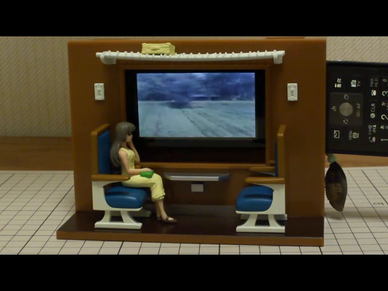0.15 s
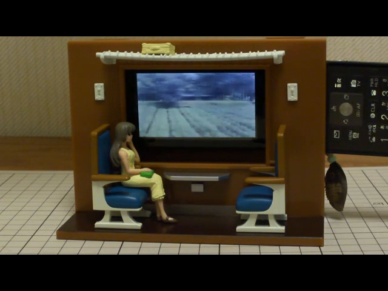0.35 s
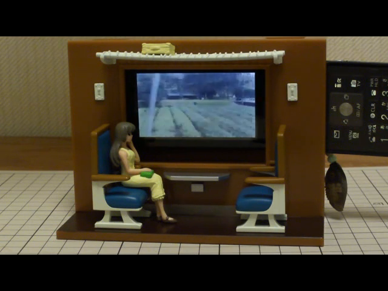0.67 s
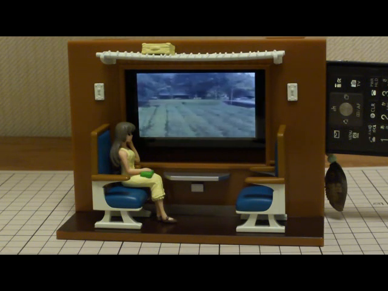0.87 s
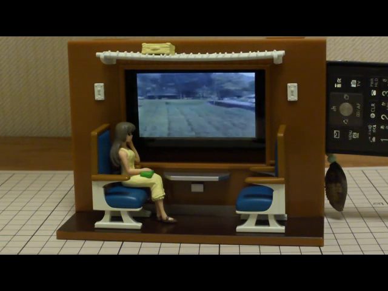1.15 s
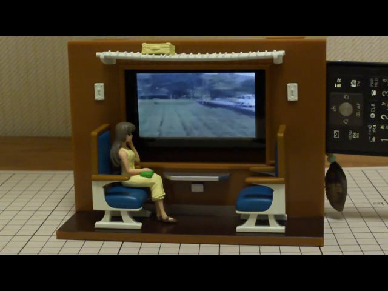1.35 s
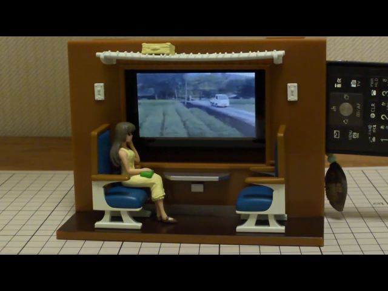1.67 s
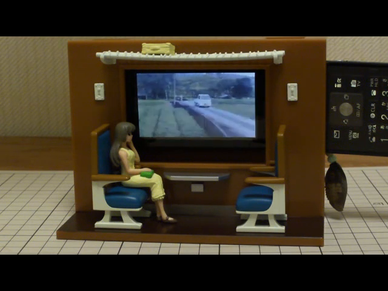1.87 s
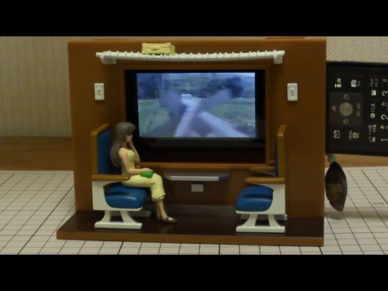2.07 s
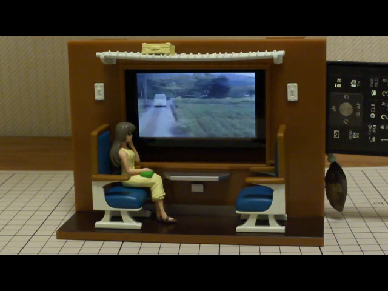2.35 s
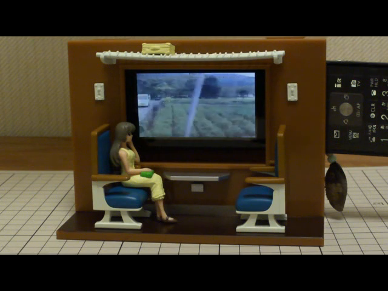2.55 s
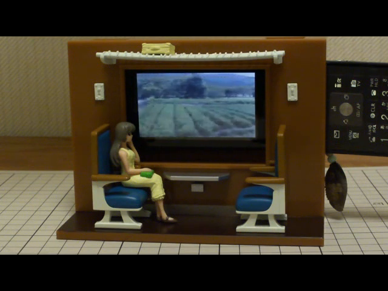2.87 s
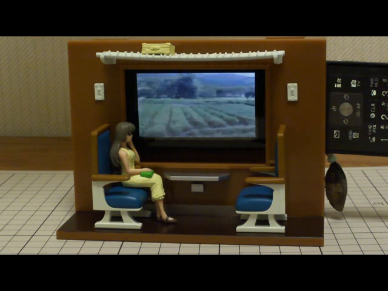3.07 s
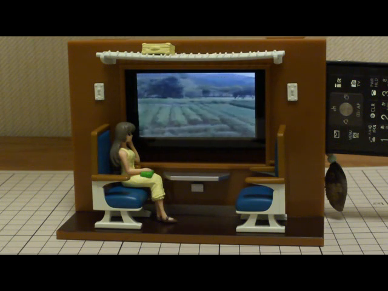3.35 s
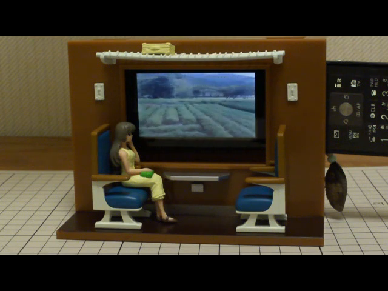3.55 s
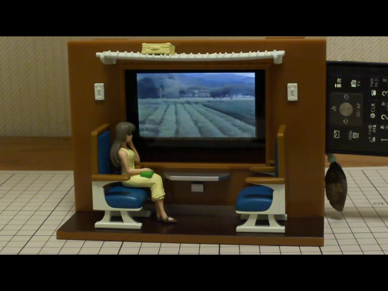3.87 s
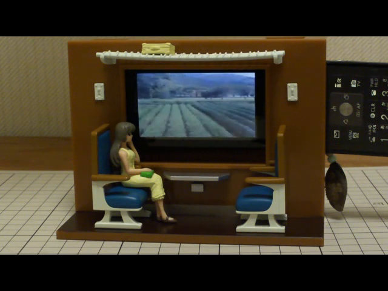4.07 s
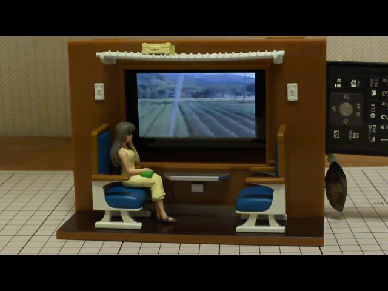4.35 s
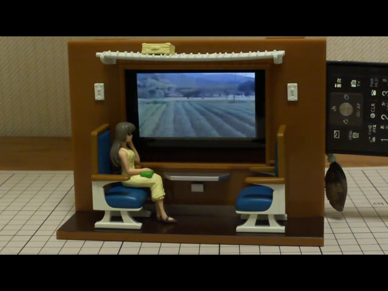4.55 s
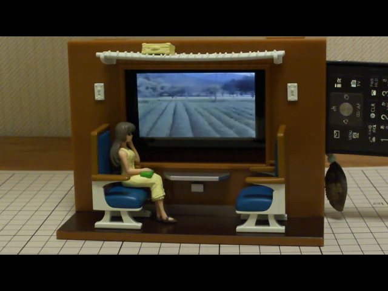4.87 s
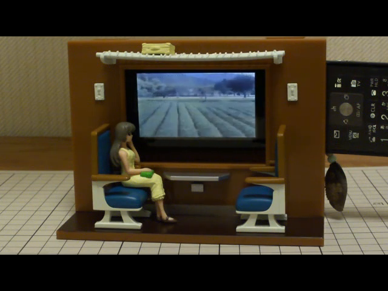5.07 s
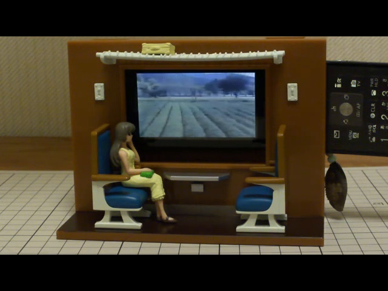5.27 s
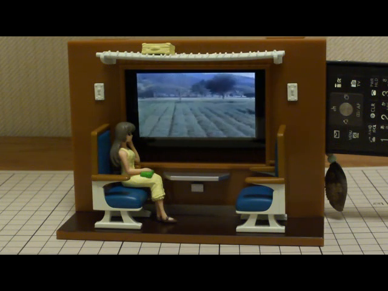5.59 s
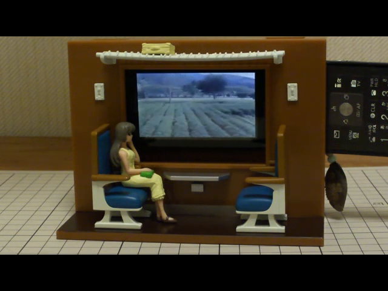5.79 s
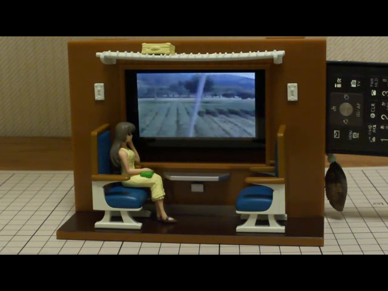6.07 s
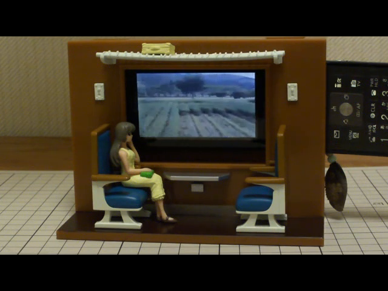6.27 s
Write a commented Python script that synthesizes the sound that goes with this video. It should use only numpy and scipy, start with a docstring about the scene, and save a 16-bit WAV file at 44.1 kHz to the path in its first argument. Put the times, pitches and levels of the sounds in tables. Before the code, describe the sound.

Tinny train wheels roll and clack over rail joints in three irregular bursts, with metallic rattles, a brief flange groan, soft hum and hiss.

```python
"""On a table, close to the microphone, a small loudspeaker in a model compartment plays a train carriage ride.
From the start wheels roll and knock, as filtered noise; fittings rattle, and a fan hums as wavering sines.
Rail joints clack in uneven clusters from 0.6, 2.6 and 4.6 s: noise bursts, ringing panels, clinks and tinkles.
Near 5.3 s a flange groans into the last cluster, as resonant noise; rolling and odd blows then carry on.
The loudspeaker gives no bass; soft room air, a gapped hiss and a thin electronic whine lie under it all."""
import sys
import numpy as np
from scipy import signal
from scipy.fft import rfft, irfft, next_fast_len
from scipy.io import wavfile
from scipy.ndimage import uniform_filter1d, map_coordinates

SR = 44100
rng = np.random.default_rng(int(sys.argv[2]) if len(sys.argv) > 2 else 0)


def output_pcm(signal):
    """Save a mono or channel-first signal as 16-bit PCM at the path in sys.argv[1].

    Samples are clipped to [-1, 1] before scaling.
    """
    pcm = np.clip(np.atleast_2d(signal).T, -1, 1) * 32767
    wavfile.write(sys.argv[1], SR, np.round(pcm).astype(np.int16))


N = 283122  # samples, 6.42 s


def amp(db):
    """Decibels to gain."""
    return 10 ** (np.asarray(db) / 20)


def unit(x):
    """Scale to rms 1."""
    return x / np.sqrt(np.mean(x ** 2) + 1e-20)


def along(points, hz):
    """Interpolate (f/Hz, value) points on a log frequency axis."""
    f, v = np.transpose(points)
    return np.interp(np.log(hz + 1), np.log(f + 1), v)


def wobble(rate, size=N):
    """A smooth random curve with rate knots a second."""
    knots = rng.standard_normal(int(size * rate / SR) + 4)
    return map_coordinates(knots, [np.arange(size) * rate / SR])


def filtered(x, response):
    """x times a complex response of frequency."""
    m = next_fast_len(N + 8192)
    return irfft(rfft(x, m) * response(np.fft.rfftfreq(m, 1 / SR)), m)[..., :N]


def causal(points, size):
    """Minimum-phase response of a spectrum: nothing sounds before the blow."""
    level_db = along(points, np.fft.rfftfreq(size, 1 / SR))
    cepstrum = irfft(np.log(amp(level_db)))
    cepstrum[1:size // 2] *= 2
    cepstrum[size // 2 + 1:] = 0
    return np.exp(rfft(cepstrum))


def resonances(hz, modes):
    """Summed bandpass response of (f/Hz, width/Hz, level/dB) modes."""
    return sum(amp(db) * 1j * hz * width / (centre * centre - hz * hz + 1j * hz * width)
               for centre, width, db in modes)


def blow(response, envelope, level_db, size):
    """Chattering contact: a noise burst through one response, with the energy of its envelope."""
    force = rng.standard_normal(len(envelope)) * envelope
    burst = irfft(rfft(force, size) * response)[:len(envelope)]
    return amp(level_db) * np.linalg.norm(envelope) * burst / np.linalg.norm(burst)


# Carriage panel resonances: (f/Hz, width/Hz, level over the broad response/dB)
PANELS = [(761.5, 20, 1), (903, 31, 1.5), (988, 15, 0.5), (1061, 32, 1), (1190, 6.3, -0.5), (1221, 10, 2),
          (1671, 12, -1), (1753, 15, 0.5), (1819, 11, 5.5), (1870, 12, 5.5), (1950, 13, 2.5),
          (2016, 15, 3.5)]


def panels(hz):
    """Narrow panel resonances stand out of the carriage's broad response."""
    return 1 + resonances(hz, PANELS)


# Rail joints: (t under the second wheel/s, strength/dB, loose clatter/dB, knock tilt/dB per octave)
JOINTS = [(0.731, -2, 0.5, -9.5), (2.7575, -2.5, -0.5, -2.5), (4.758, -2.5, -1, -1)]
# How each wheel strikes, before the joint's strength:
# (level/dB, weight of the knock/dB, edge of the steel/dB, cabin tail/dB)
WHEELS = [(-47, 0.5, 3.5, 23), (-39, 1, 3.5, -0.5), (-36.5, 1, 2, -0.5), (-47, 1.5, 1.5, 10.5)]
# Two bogies, place along the train from the second wheel: (distance/m)
WHEEL_PLACES_M = [-1.98, 0, 3.705, 6.18]
# Further blows, some alone, some thickening a clack:
# (t/s, level/dB, weight of the knock/dB, edge of the steel/dB, cabin tail/dB)
FURTHER_BLOWS = [(0.347, -50.5, -13, 3, 6), (0.555, -42, -7.5, -0.5, 22), (0.846, -42, -4.5, 6, 5),
                 (0.868, -48, -1, 7.5, 4), (1.17, -48.5, -5, 0, 7), (1.615, -45, -5, 6.5, 3),
                 (1.642, -46, -1.5, 3.5, 19), (1.75, -46, -1, 3, 2), (2.059, -56.5, -12, 12, -6),
                 (2.183, -48.5, -12, -9, 6), (2.599, -45.5, -14, 2, 1), (2.713, -51.5, 0.5, -4, 29),
                 (2.929, -46, -7.5, 7, -4), (3.693, -54, -2, 5.5, 8), (3.798, -50.5, -8, -3, 25),
                 (3.861, -50.5, -4, 5, 2), (4.044, -53.5, -8, 5, -3), (4.175, -51, -4, -2, 8),
                 (4.981, -57, 1, 0, -12), (5.035, -42.5, -4, 8.5, 21), (5.078, -51, 2, 1, 10),
                 (5.311, -43.5, -4, -6.5, 2), (6.168, -51, -5, -2, 10)]
SPEED_M_PER_S, ACCEL_M_PER_S2 = 12.2, 0.085  # speed at t = 0; the train gathers a little


def blows():
    """Each wheel meets each joint later by its place over the speed; further blows join the list."""
    clacks = []
    for s, strength_db, clatter_db, tilt_db in JOINTS:
        speed = SPEED_M_PER_S + ACCEL_M_PER_S2 * s
        for place, (level_db, *colour) in zip(WHEEL_PLACES_M, WHEELS):
            clacks.append((s + place / speed, level_db + strength_db, *colour, clatter_db, tilt_db))
    return clacks + [(*further, 0, 0) for further in FURTHER_BLOWS]  # no joint's clatter or tilt


# Parts of a blow as the loudspeaker gives them, spectra before each part's level: (f/Hz, level/dB per Hz)
KNOCK = [(40, -82), (250, -52), (480, -22.5), (650, -10.5), (780, -3.5), (920, 0), (1080, 2), (1240, -1),
         (1340, -7), (1600, -9), (2600, -52), (9000, -100)]
CLANG = [(100, -70), (700, -31), (1300, -17.5), (1560, -11), (1720, 1), (1830, -5.5), (2050, -2),
         (2170, -14.5), (2400, -22), (3100, -55), (9000, -92.5)]
CLATTER = [(200, -88), (1500, -24), (2250, 9.5), (2550, 11.5), (2680, 2.5), (2820, -0.5), (3020, -57),
           (4100, -49), (10000, -87)]
PING = [(400, -50), (2800, -47), (3150, 21), (3400, 11), (3750, 7.5), (4000, -49), (10000, -55)]
TICK = [(500, -55), (3000, -39), (4000, -5), (5200, -3), (6000, 1), (7100, 5), (7500, -8), (9500, -37),
        (12000, -70)]
# Loose steel fittings: (f/Hz, width/Hz, level over the broad response/dB)
STEEL = [(2080, 44, 10.5), (2250, 59, 3), (2787, 51, 5.5), (3394, 22, 12), (3550, 26, 9)]
# levels of the parts against the blow, before its weight, edge and clatter
KNOCK_DB, CLANG_DB, CLATTER_DB, PING_DB, TICK_DB = 1, 0.5, -15, -33, -26.5
PING_GROWS = 0.89  # dB of ping per dB of edge
# knock tilt in dB per octave: at HEAVY_DB, per dB above it (heavy is deeper), per dB of tail, per dB of edge
HEAVY_DB, KNOCK_TILT_DB, HEAVY_TILT, TAIL_TILT, EDGE_TILT = -36, 0.5, -0.18, 0.13, 0.18
RISE_S, SMEAR = 0.0018, 0.52  # attack at 0 dB of cabin tail; dB of lengthening per dB of tail
STEEL_RISE_S = 0.0018  # extra build-up of the steel chatter
SHIVER_T60_S = 0.5  # the finest steel parts shiver on after the knock


def joints(contact=0.013, release=0.0051, cabin_t60=0.34, strike_db=-2.5, chatter_db=2.0, shiver_db=2.5,
           size=32768):
    """Each blow chatters for a moment, as a wheel does across the gap, then the cabin rings on."""
    t = np.arange(SR // 2) / SR
    hz = np.fft.rfftfreq(size, 1 / SR)
    octaves = np.log2(np.clip(hz, 500, 1500) / 1000)  # the tilt acts from 500 to 1500 Hz
    knock, clang = causal(KNOCK, size) * panels(hz), causal(CLANG, size) * panels(hz)
    steel = 1 + resonances(hz, STEEL)
    clatter, ping, tick = (causal(part, size) * steel for part in (CLATTER, PING, TICK))
    out = np.zeros(N + SR)
    for s, level_db, weight_db, edge_db, tail_db, clatter_db, joint_tilt_db in blows():
        strike = amp(strike_db) * np.exp(-np.maximum(t - contact, 0) / release)
        cabin = amp(tail_db - 60 * t / cabin_t60)
        attack = 1 - np.exp(-t / (RISE_S * amp(SMEAR * tail_db)))
        envelope = attack * np.hypot(strike, cabin)
        envelope /= np.sqrt(np.mean(envelope[:SR // 40] ** 2))  # rms 1 over the first 25 ms
        # the wheel bounces, so the force comes in uneven knocks
        envelope *= amp(chatter_db * wobble(228.0, size=len(t)))
        tilt_db = KNOCK_TILT_DB + HEAVY_TILT * (level_db + weight_db - HEAVY_DB)
        tilt_db += joint_tilt_db + TAIL_TILT * tail_db + EDGE_TILT * edge_db
        build = 1 - np.exp(-t / STEEL_RISE_S)
        chatter = envelope * build
        shiver_course_db = shiver_db * wobble(180, size=len(t)) - 60 * t / SHIVER_T60_S
        shiver = attack * build * amp(shiver_course_db)
        parts = [(knock * amp(tilt_db * octaves), envelope, KNOCK_DB + weight_db),
                 (clang, envelope, CLANG_DB),
                 (clatter, chatter, CLATTER_DB + edge_db + clatter_db),
                 (ping, chatter, PING_DB + PING_GROWS * edge_db),
                 (tick, shiver, TICK_DB + edge_db)]
        for part, force, db in parts:
            out[round(s * SR):][:len(t)] += blow(part, force, level_db + db, size=size)
    return out[:N]


# Centre of the random rattles: (low ring over high ring/dB, low ring f/Hz, high ring f/Hz, ring t60/s)
RATTLE_RING = (-9, 1023, 1853, 0.14)
RATTLE_PER_S, RATTLE_DB, RATTLE_SPREAD_DB = 12, -56.5, 1.8
RATTLE_DETUNE = 0.059  # share by which the pitches scatter


def rattles(count=80):
    """Fittings are shaken faintly at random moments, as rows like those of IMPACTS."""
    low_db, low_hz, high_hz, t60 = RATTLE_RING
    times = np.cumsum(rng.exponential(size=count)) / RATTLE_PER_S
    rows = []
    for s, (a, b, c) in zip(times, rng.standard_normal((count, 3))):
        if s < N / SR:
            low, high = low_hz * (1 + RATTLE_DETUNE * b), high_hz * (1 + RATTLE_DETUNE * c)
            rows.append((s, RATTLE_DB + RATTLE_SPREAD_DB * a, low_db, low, high, t60))
    return rows


# Hard metal-on-metal contacts, each ringing two panels of its own:
# (t/s, level/dB, low ring over high ring/dB, low ring f/Hz, high ring f/Hz, ring t60/s)
IMPACTS = [(0.146, -41.5, -22, 1220, 1809, .13), (0.388, -45.5, -10, 1000, 1827, 0.18),
           (0.453, -48, -10, 1045, 2090, .1), (0.569, -41.5, -20, 1040, 1780, 0.068),
           (0.732, -33.5, -7.5, 981, 1773, 0.19), (0.748, -36.5, 0, 997, 1825, 0.12),
           (0.787, -41, -1, 1022, 1750, 0.13), (0.851, -38, -8, 910, 1674, 0.18),
           (1.034, -30.5, 6, 1058, 1972, 0.14), (1.044, -35.5, 0, 920, 1744, 0.077),
           (1.078, -41, -1, 1060, 1890, 0.11), (1.236, -40, -1, 1086, 1870, 0.12),
           (1.243, -38, -1, 1162, 1840, 0.13), (1.257, -46.5, 5, 912, 1860, .14),
           (1.271, -44, -2, 905, 1830, 0.17), (1.455, -47.5, -18, 1060, 1635, 0.089),
           (1.618, -42, -6, 944, 1665, .14), (1.648, -44.5, -3, 933, 1630, 0.24),
           (1.763, -39, -9, 980, 1876, 0.12), (2.1844, -46.5, 0, 1100, 1797, 0.093),
           (2.599, -42, -15, 1050, 1840, .15), (2.626, -39.5, -4, 892, 1817, 0.2),
           (2.668, -45, -15, 1053, 2010, .12), (2.761, -35, -11, 1090, 1740, .11),
           (2.769, -36.5, 7, 1058, 1880, .16), (2.782, -40, 1, 973, 1745, 0.12),
           (2.933, -40.5, -2, 1027, 1677, 0.25), (2.953, -42, 3, 1025, 1690, .15),
           (3.06, -30.5, 4, 914.5, 1797, .1), (3.068, -35, -11, 994, 1765, 0.094),
           (3.087, -40.5, -7, 996, 1950, 0.31), (3.258, -39, -5, 1073, 1590, .05),
           (3.849, -46, 7, 993, 1790, .08), (3.874, -45, -9, 883, 1863, 0.13),
           (4.047, -42.5, 4, 1042, 1800, 0.2), (4.177, -43, -3, 1034, 1768, 0.11),
           (4.7636, -33, 3, 992, 1763, 0.094), (4.774, -39.5, 8, 1010, 1745, 0.11),
           (5.042, -34, -1, 1143, 1774, .1), (5.0528, -30.5, -6.5, 1227, 1827, 0.2),
           (5.089, -38.5, 9, 1222, 1870, 0.27), (5.107, -39.5, 2, 1210, 1955, .14),
           (5.25, -41, -5, 1010, 1620, 0.19), (5.3155, -31, -3.5, 990, 1782, 0.099),
           (5.352, -41.5, -7, 1025, 1954, .12), (5.62, -43.5, 0, 955, 1940, 0.09),
           (5.673, -50, 1, 1046, 2030, 0.15)]


def impacts(crack_db=4.0, crack_decay=0.002, ring_db=0.0, ring_rise=0.0012, rough=0.29, tick_db=-30,
            size=8192):
    """A crack of a few milliseconds, then two panels ring on unsteadily."""
    t = np.arange(size) / SR
    knock, clang, tick = (causal(part, size) for part in (KNOCK, CLANG, TICK))
    crack = np.exp(-t / crack_decay)
    out = np.zeros(N + SR)
    for s, level_db, low_db, low_hz, high_hz, t60 in IMPACTS + rattles():
        here = out[round(s * SR):][:len(t)]
        ring = np.sqrt(2) * amp(ring_db - 60 * t / t60) * (1 - np.exp(-t / ring_rise))
        here += blow(tick, crack, level_db + tick_db, size=size)
        shares = np.array([amp(low_db), 1]) / np.hypot(amp(low_db), 1)
        for share, body, hz in zip(shares, (knock, clang), (low_hz, high_hz)):
            phase = 2 * np.pi * (hz * t + rng.random())
            tone = np.sin(phase + rough * wobble(145, size=len(t)))
            here += amp(level_db) * share * (blow(body, crack, crack_db, size=size) + ring * tone)
    return out[:N]


# A loose steel fitting rings out, level before each STEEL mode's level and the tilt: (t/s, level/dB)
CLINKS = [(0.567, -74), (0.849, -58.5), (2.761, -63), (5.052, -70)]
CLINK_T60_S, CLINK_TILT_DB, CLINK_PIVOT_HZ = 0.18, -28, 2830  # tilt in dB per octave about the pivot


def clinks(rise=0.002, rough=0.7):
    """The fitting's modes ring together, buzzing slightly on their mount."""
    t = np.arange(SR // 3) / SR
    envelope = np.sqrt(2) * amp(-60 * t / CLINK_T60_S) * (1 - np.exp(-t / rise))
    out = np.zeros(N + SR)
    for s, level_db in CLINKS:
        for hz, _, db in STEEL:
            phase = 2 * np.pi * (hz * t + rng.random())
            tone = np.sin(phase + rough * wobble(320, size=len(t)))
            mode_db = level_db + db + CLINK_TILT_DB * np.log2(hz / CLINK_PIVOT_HZ)
            out[round(s * SR):][:len(t)] += amp(mode_db) * envelope * tone
    return out[:N]


# Small loose parts tinkle on one high note each: (t/s, level/dB, f/Hz, t60/s)
TINKS = [(0.858, -63, 6130, .3), (0.883, -68, 6600, .22), (1.05, -71, 6400, .25), (2.763, -70, 5790, .16),
         (2.931, -66, 5790, 0.18), (2.932, -67, 6890, .2), (3.06, -67, 7140, .2), (5.125, -57, 6900, 0.033),
         (5.14, -71, 3450, .4), (5.262, -65, 7040, .12)]


def tinks(rise=0.0013, rough=0.65):
    """Each small part rings briefly and a little roughly."""
    t = np.arange(SR // 4) / SR
    out = np.zeros(N + SR)
    for s, level_db, hz, t60 in TINKS:
        tone = np.sin(2 * np.pi * hz * t + rough * wobble(300, size=len(t)))
        envelope = np.sqrt(2) * amp(level_db - 60 * t / t60) * (1 - np.exp(-t / rise))
        out[round(s * SR):][:len(t)] += envelope * tone
    return out[:N]


# A flange rubs, swelling into one clack and dying after it: (t/s, level/dB)
GROAN = [(5.19, -62), (5.26, -43), (5.33, -41), (5.365, -44.5), (5.43, -67)]
# The notes it sings, before the rolling spectrum: (f/Hz, width/Hz, level/dB)
GROAN_MODES = [(1013, 42, 5.5), (1890, 130, -6)]


def groan():
    """Flange friction sings in two narrow resonances."""
    s, level_db = np.transpose(GROAN)
    swell = amp(np.interp(np.arange(N) / SR, s, level_db, left=-np.inf, right=-np.inf))
    rub = swell * rng.standard_normal(N)
    song = filtered(rub, lambda hz: resonances(hz, GROAN_MODES) * amp(along(ROLL, hz)))
    return song * np.linalg.norm(swell) / np.linalg.norm(song)


# Wheels rolling on the rail, spectrum before panels and level: (f/Hz, level/dB per Hz)
ROLL = [(250, -31), (520, -5), (750, -5.5), (930, -2), (1230, -4.5), (1380, -8), (1560, -4.5), (1740, 0),
        (2020, -5), (2180, -5.5), (2820, -24.5), (3100, -42), (7000, -26.5), (8000, -72)]
# Course of the rolling; only departures from its mean count, scaled by swing: (t/s, level/dB)
ROLL_COURSE = [(0.0, -48), (0.41, -50.5), (0.95, -48), (1.43, -53), (1.73, -48), (1.86, -51), (2.57, -48.5),
               (2.84, -49.5), (3.7, -50.5), (4.43, -51), (5.27, -50), (5.42, -51), (5.69, -54),
               (6.42, -52.5)]


def rolling(level_db=-50.5, swing=0.44, sway_db=1.45, judder_db=1.06, patchy_db=0.97):
    """Rough steel on rough steel shakes the same panels, never quite evenly."""
    course_db = np.interp(np.arange(N) / SR, *np.transpose(ROLL_COURSE))
    roll_db = level_db + swing * (course_db - course_db.mean())
    z = signal.stft(rng.standard_normal(N), nperseg=512)[2]
    # each stretch of rail has its own roughness, so the colour wanders
    field = uniform_filter1d(rng.standard_normal(z.shape), size=5, axis=0)
    field = uniform_filter1d(field, size=12, axis=1)
    force = signal.istft(z * amp(patchy_db * unit(field)), nperseg=512)[1][:N]
    force *= amp(sway_db * wobble(8.1) + judder_db * wobble(45))
    return amp(roll_db) * unit(filtered(force, lambda hz: amp(along(ROLL, hz)) * panels(hz)))


# Reflections around the loudspeaker; treble comes mostly this way: (f/Hz, level against the direct sound/dB)
ROOM = [(300, -12), (900, -9), (1800, -11), (2500, -11), (3000, -26), (3500, -17.5), (4400, 1.5),
        (8000, -3.5)]
ROOM_DELAY_S, PORT_LAG_S = 0.0028, 0.00001  # late reflections; direct sound reaches the right port first


def room(x):
    """Direct sound from the front, plus phase-scrambled reflections of opposite sign at the two ports."""
    z = signal.stft(x, nperseg=384)[2]
    scrambled = z * np.exp(2j * np.pi * rng.random(z.shape))
    diffuse = np.std(x) * unit(signal.istft(scrambled, nperseg=384)[1][:N])
    side = filtered(diffuse, lambda hz: amp(along(ROOM, hz)) * np.exp(-2j * np.pi * hz * ROOM_DELAY_S))
    ports = np.array([[-1], [1]])
    direct = filtered(x, lambda hz: np.exp(1j * np.pi * hz * PORT_LAG_S * ports))
    return direct + np.array([side, -side])


# Fan and mains lines in the room, before flutter and balance: (f/Hz, level/dB rms)
HUM = [(96, -87.5), (120, -79.5), (274.6, -68), (298.3, -69), (313.5, -75.5), (439.3, -57)]


def fan(drift_hz=0.44, flutter_db=-0.9):
    """Steady motor and blade lines waver slightly, drifting in proportion to their pitch."""
    t = np.arange(N) / SR
    drift = drift_hz / HUM[-1][0] * np.cumsum(wobble(3.4)) / SR  # drift_hz applies to the last line
    hum = np.zeros(N)
    for hz, db in HUM:
        level = np.sqrt(2) * amp(db + flutter_db * wobble(25))
        hum += level * np.sin(2 * np.pi * (hz * (t + drift) + rng.random()))
    return hum


# Room air, spectrum before its level: (f/Hz, level/dB per Hz)
AIR = [(20, -32), (55, -37), (90, -13), (150, -7), (250, -1), (340, -1.5), (480, 0.5), (700, -4),
       (1300, -48), (2500, -48), (4000, -76)]
# Room air between the two microphone ports: (f/Hz, left-right likeness from 0 to 1)
AIR_ALIKE = [(30, .35), (60, 0.62), (130, 0.34), (290, 0.18), (640, 0.059), (3000, 0.23)]


def air(level_db=-57):
    """The soft rush of the room: shared and opposed noise make the ports partly alike."""
    def response(hz):
        turn = np.arccos(np.clip(along(AIR_ALIKE, hz), -1, 1)) / 2
        return amp(along(AIR, hz)) * [np.cos(turn), np.sin(turn)]

    shared, opposed = filtered(rng.standard_normal((2, N)), response)
    return amp(level_db) * unit(np.array([shared + opposed, shared - opposed]))


# Hiss with gaps near 4.9 kHz and 11.7-13.8 kHz, as lossy audio coding leaves;
# spectrum before its level: (f/Hz, level/dB per Hz)
HISS = [(1000, -92), (3300, 1.5), (4000, -13), (4900, -28), (5500, 4.5), (6800, 5.5), (8500, 5),
        (9700, 0.5), (10800, -4.5), (11700, -33), (13800, -53), (14700, -3.5), (15700, -35)]
# Electronic whine: (f/Hz, level/dB rms, waver/Hz)
WHINE = [(7853, -81.5, 5), (7881, -85, 8), (14998, -100, 3)]


def electronics(hiss_db=-68):
    """Gapped hiss of its own in each channel, and a thin unsteady whine out of step between the ports."""
    hiss = unit(filtered(rng.standard_normal((2, N)), lambda hz: amp(along(HISS, hz))))
    step = np.array([[0.25], [-0.25]])  # radians
    whine = np.zeros((2, N))
    for hz, db, waver in WHINE:
        phase = 2 * np.pi * np.cumsum(hz + waver * wobble(40)) / SR
        whine += np.sqrt(2) * amp(db) * np.sin(phase + step)
    return amp(hiss_db) * hiss + whine


def scene(train_left_db=0.22, fan_left_db=0.7):
    """Train and fan are both a little louder on the left."""
    loudspeaker = joints() + impacts() + clinks() + tinks() + groan() + rolling()
    train = room(loudspeaker) * amp([[train_left_db], [-train_left_db]])
    return train + fan() * amp([[fan_left_db], [-fan_left_db]]) + air() + electronics()


TOP_HZ = 15750


def record(dry):
    """Nothing is kept at or above the band limit."""
    return filtered(dry, lambda hz: hz < TOP_HZ)


dry = scene()
out = record(dry)
output_pcm(out)
```